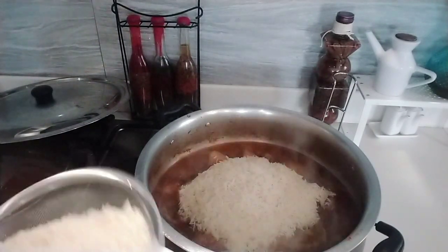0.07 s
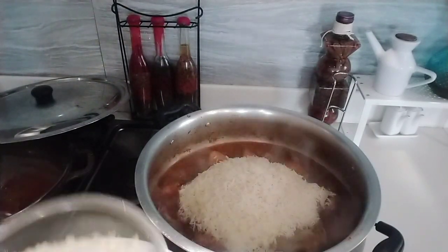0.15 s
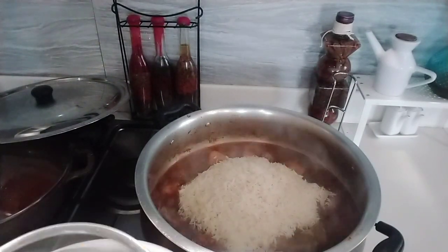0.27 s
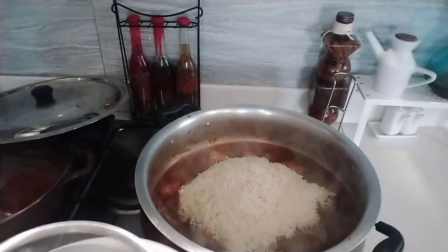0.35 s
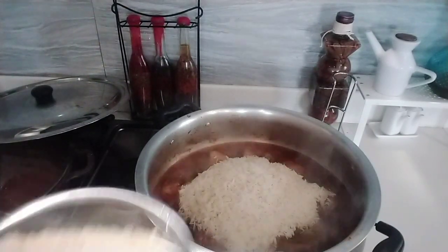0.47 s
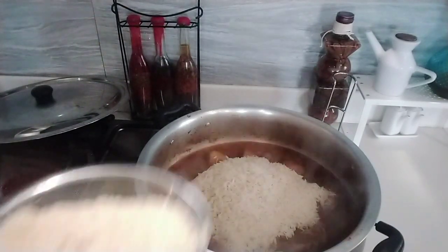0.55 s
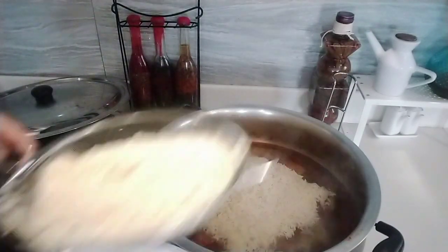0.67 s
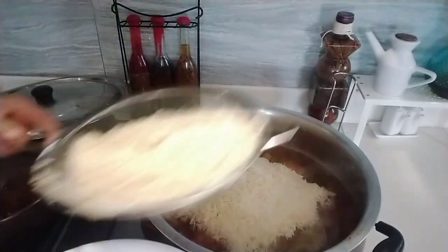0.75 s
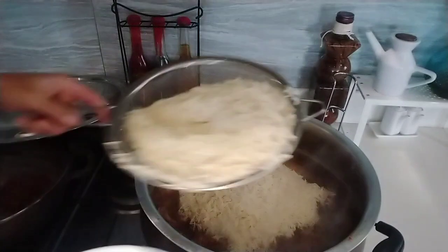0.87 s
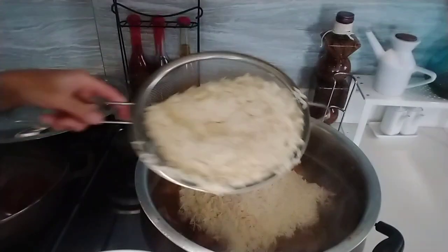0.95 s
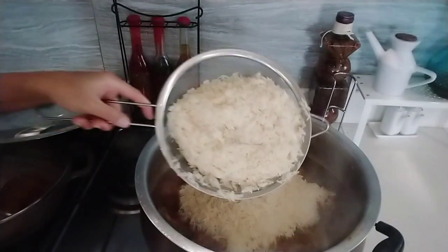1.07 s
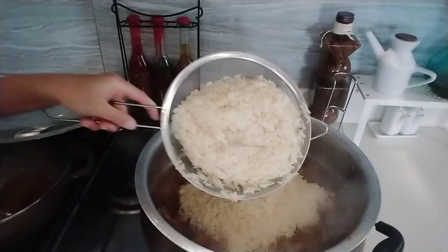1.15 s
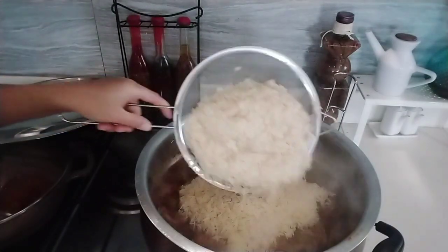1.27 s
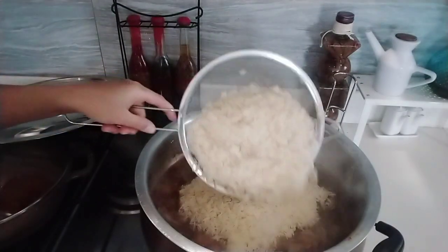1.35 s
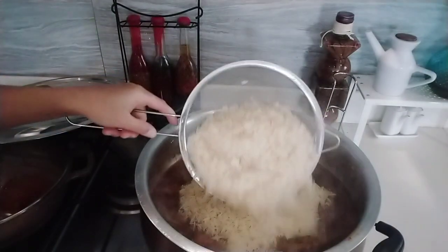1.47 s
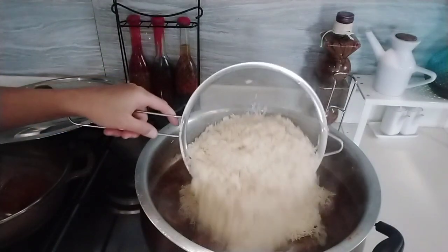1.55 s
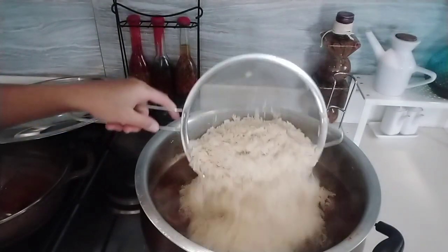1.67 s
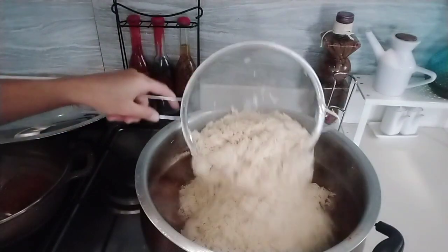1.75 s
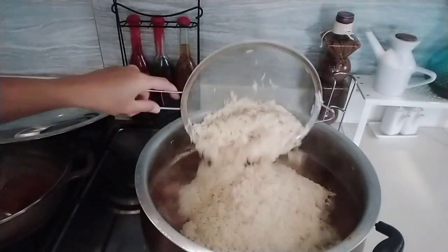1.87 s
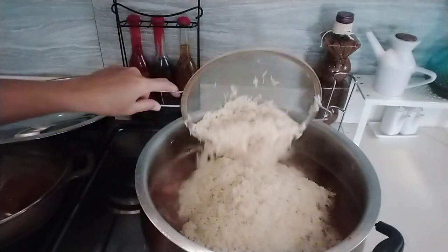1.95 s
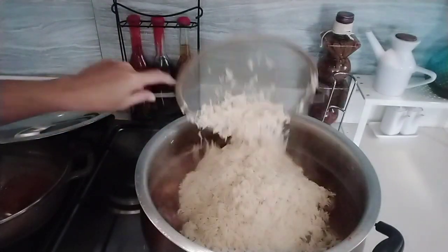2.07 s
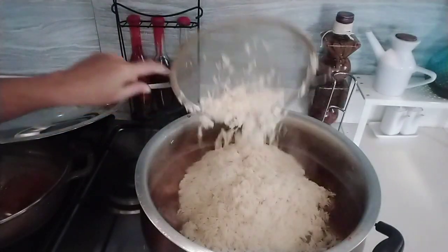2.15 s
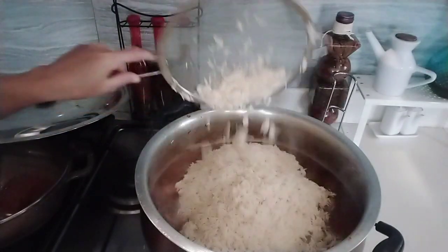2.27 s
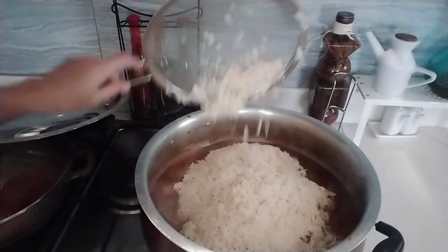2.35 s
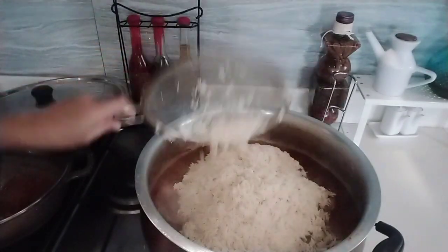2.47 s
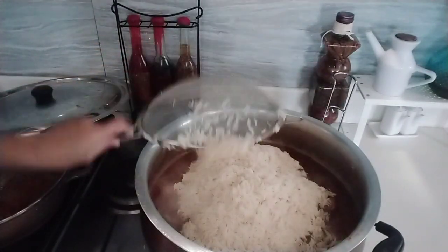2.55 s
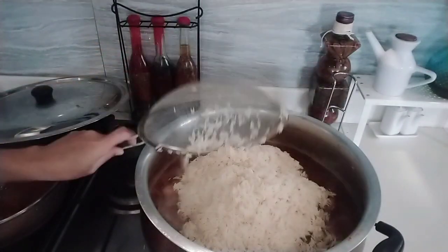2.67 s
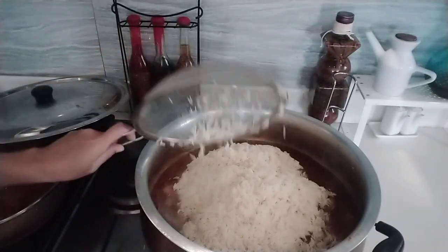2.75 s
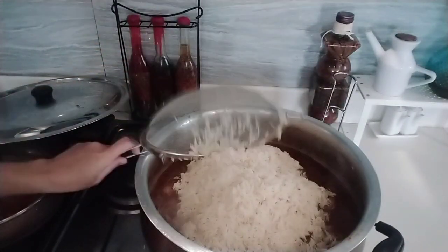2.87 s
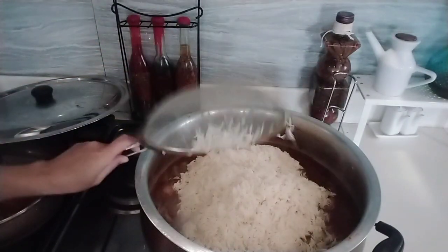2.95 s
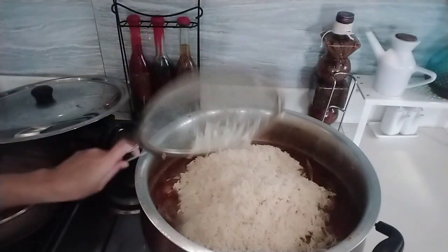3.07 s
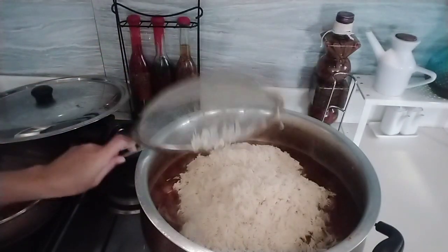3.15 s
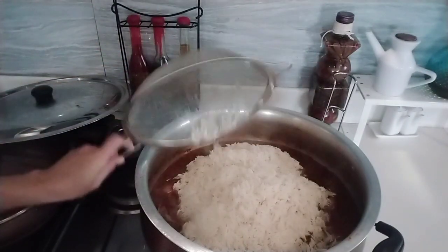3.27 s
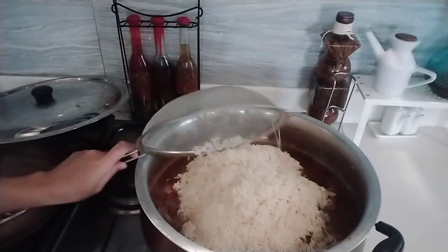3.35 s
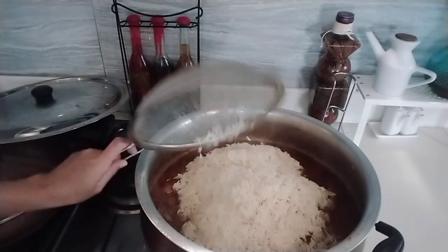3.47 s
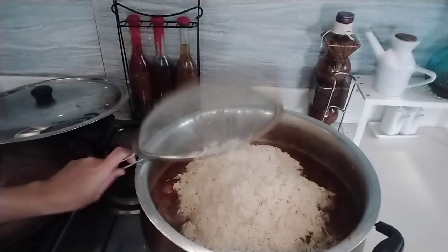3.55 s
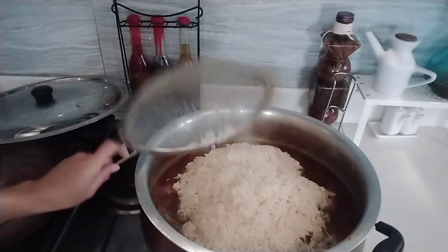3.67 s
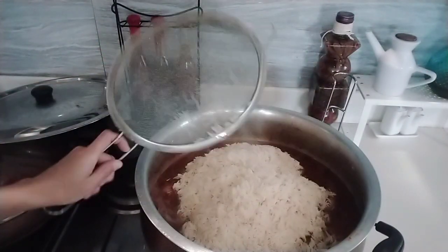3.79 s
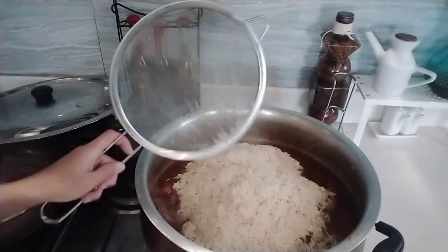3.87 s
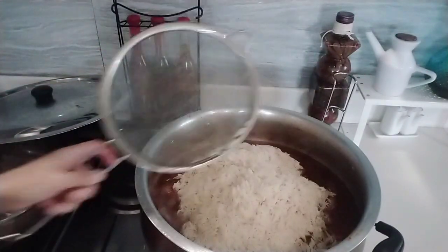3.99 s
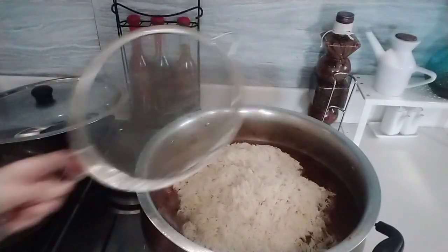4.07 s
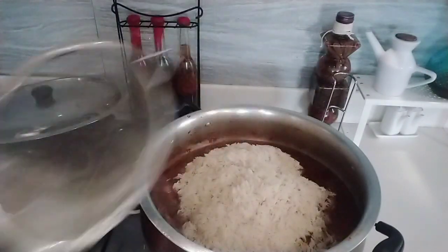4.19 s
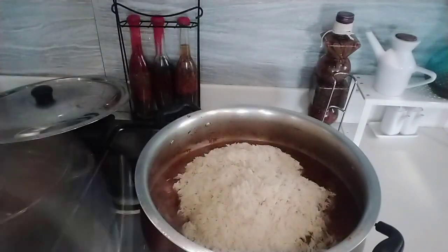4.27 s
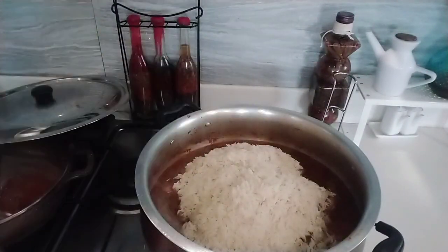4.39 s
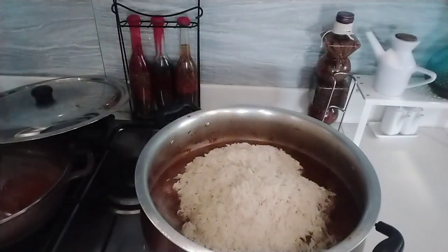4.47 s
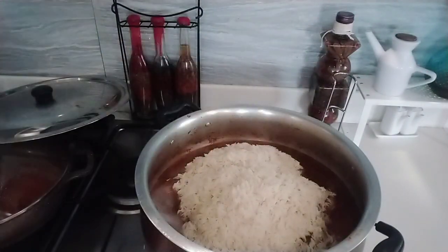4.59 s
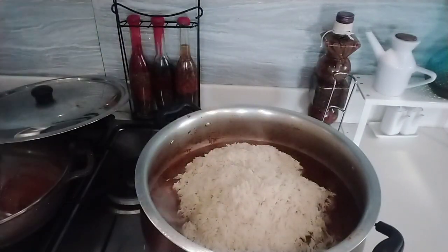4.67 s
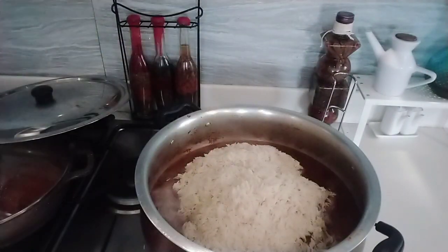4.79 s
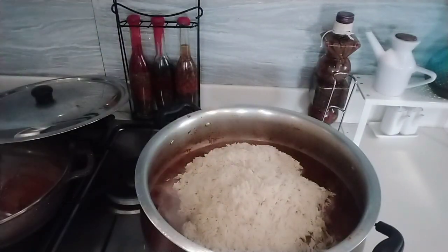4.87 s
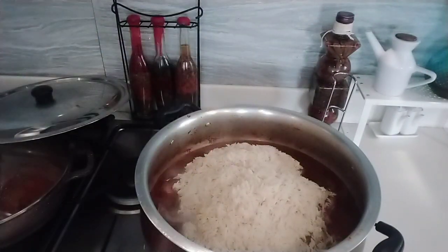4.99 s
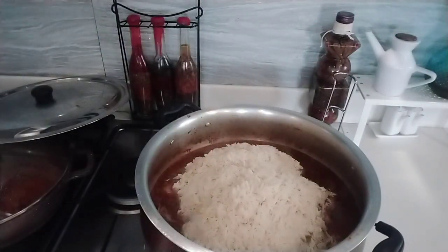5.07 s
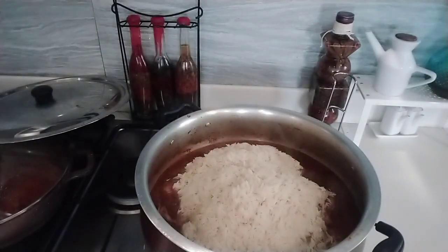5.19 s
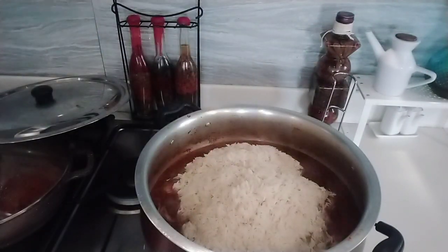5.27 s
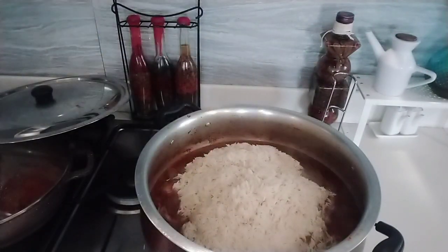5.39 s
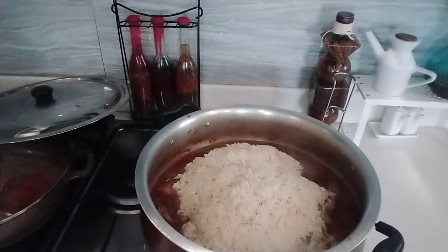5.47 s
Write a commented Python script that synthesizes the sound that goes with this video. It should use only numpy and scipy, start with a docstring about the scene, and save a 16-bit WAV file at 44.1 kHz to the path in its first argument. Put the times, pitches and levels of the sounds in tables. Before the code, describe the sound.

Steady simmering hiss and soft bubbling plops, a swelling rush of falling grains, five hard metallic clanks, then quieter sizzle with small ticks.

```python
"""In a small kitchen, a steel pot simmers on a gas burner while wet rice slides in from a wire strainer.
The strainer is then knocked five times on the rim: each blow is a burst of noise and a crowd of ringing tones.
Shaped noise makes the burner, low thumps and sizzle, rising sine tones the plops, random clicks the rice and
its scrape. Short bursts of noise make small taps and wet ticks. A small, bright microphone hears it all through
a limiter and a gain control that stays turned down after the knocks."""
import sys
import numpy as np
from scipy import signal
from scipy.io import wavfile
from scipy.ndimage import uniform_filter1d

SR = 44100
rng = np.random.default_rng(int(sys.argv[2]) if len(sys.argv) > 2 else 0)


def unload_audio(sound):
    """Save the sound as a 16-bit wav file, at the path given as the first command line argument."""
    columns = np.transpose(np.atleast_2d(sound))
    # keep every value between -1 and 1, then stretch to whole-number steps
    steps = np.round(np.clip(columns, -1, 1) * 32767)
    wavfile.write(sys.argv[1], SR, steps.astype(np.int16))


N = 243873
TIME = np.arange(N) / SR  # seconds

# burner flame, its low rumble: (frequency [Hz], level per Hz [dB])
FLAME_SPECTRUM = [(15, -59), (25, -25), (38, -9), (50, -14), (68, 0.5), (95, -13.5), (120, -2.5), (142, 1),
                  (158, -4.5), (182, -2.5), (230, -17), (330, -16.5), (600, -38.5)]
# swells of the low rumble, short or long: gusts of the flame, low thumps, and near 1.26 s the thud of
# landing rice: (time of the peak [s], length [s], rise [dB])
RUMBLE_SWELLS = [(0.303, 0.17, 3.5), (1.26, 0.83, 3), (2.714, 0.74, 5.5), (4.764, 0.1, 5.5),
                 (5.11, 0.15, 3.5), (5.4, 0.25, 8)]
# sizzle at the wall of the pot: (frequency [Hz], level per Hz [dB])
SIZZLE_SPECTRUM = [(150, -21.5), (250, 3), (420, 10.5), (580, 0), (850, -5.5), (1200, -5.5), (1700, -2),
                   (2800, -2), (4500, -3.5), (6000, -3.5), (8000, -2), (11000, -5), (15500, -10)]
# base levels [dB]: the sizzle before pot and microphone colour it,
# the flame before the microphone and its own swells and flutter
SIZZLE_DB, FLAME_DB = -52.5, -50.5
# bursting bubbles: (time [s], starting pitch [Hz], level [dB])
PLOPS = [(0.963, 1330, -47), (1.183, 1080, -43), (1.291, 1020, -44), (1.542, 1050, -37.5),
         (1.915, 670, -47), (2.1, 730, -36), (2.743, 1000, -37.5), (4.776, 1060, -51)]
# resonances of the air in the pot: (frequency [Hz], width [Hz], level [dB])
POT_AIR = [(347, 18, -2), (461.7, 12.7, 3.5), (700, 87, 0), (1002, 98, 0), (1318, 126, -1)]
# small taps and spits: (time [s], level [dB], low weight [dB], top rattle of the mesh [dB])
TAPS = [(.174, -40, -18, -10), (.358, -51, 12.5, -10), (0.369, -38, 1, -8), (0.612, -44.5, -18, -3),
        (1.327, -42.5, 3, -6), (1.502, -40.5, -16, -6), (2.1, -42, -15, -4), (2.171, -44.5, -11, -10),
        (4.239, -43.5, 1, -9), (4.495, -46, 5, -4), (4.612, -39, 4, 1), (4.633, -37.5, 2.5, 0)]
# wet ticks of grains and drips: (time [s], pitch [Hz], level [dB])
DRIPS = [(0.439, 2980, -48), (.478, 4380, -48), (2.104, 4200, -43.5), (2.392, 3930, -43), (3.14, 4100, -32),
         (4.303, 3300, -48), (4.743, 4080, -46), (4.856, 3260, -47), (5.147, 4100, -51)]
# colour of the falling grains: (frequency [Hz], level per Hz [dB])
PATTER_SPECTRUM = [(200, -19), (500, -7), (750, 6), (1400, -1), (1900, -8), (2700, 3.5), (3550, -15),
                   (3850, -3), (4200, 4.5), (4800, -6), (6500, 0.5), (15000, -6.5)]
# the rice comes in surges, a first lump, the bulk, the shaken-out rest:
# (time of the peak [s], length [s], level [dB])
RICE_SURGES = [(1.205, 0.98, -63), (2.193, 1, -54), (3.053, 1, -50.5)]
# the last grains scrape down the tipped mesh, a single row:
# (time of the peak [s], length [s], level [dB], pitch [Hz], width [Hz])
SCRAPE = (2.5, 0.9, -55, 4030, 300)
# blows of the strainer, with light touches and bounces: (time [s], force [dB], low ring of the pot [dB],
# ring of the hoop [dB], top rattle of the mesh [dB], crack [dB], clear modes [dB])
KNOCKS = [(2.458, -26, 9, -1, -17, 0, -12), (2.4703, -9, 3, 5, -9, 10.5, 2),
          (2.78, -20, 6, -2, -42, 10, -10), (2.7852, -3, 5, 3.5, -5, 1.5, 1.5),
          (2.9756, -2, -6.5, -5, -3, 5, -1.5), (3.012, -2, -4.5, -6.5, -6.5, -15, 1),
          (3.2084, -5.5, 3, -16, -47, -4, 0.5), (3.212, 2.5, 0.5, 0, -6.5, 5, -2),
          (3.46, 2, -4, -3, -5.5, 4, -3)]
# ringing tones (modes) of pot and strainer: (frequency [Hz], level as heard through the microphone [dB])
STEEL_MODES = [(581, -10), (649, -11), (1015, -3.5), (1051, -10.5), (1280, -1.5), (1319, -9.5), (1384, -12),
               (1416, -5), (1561, -8), (1728, -7), (1785, -1.5), (1879, -22), (2083, -13), (2534, -9.5),
               (2739, -8.5), (2989, -9.5), (3374, -4.5), (3949, -1), (4261, -16), (4409, -11), (4492, -5),
               (4706, -7), (4888, -24), (5101, -9), (5385, -1), (7251, 0), (7751, -3), (8041, 2), (8573, 0),
               (9236, 5)]
# the crowd of weaker modes between them: (frequency [Hz], level per Hz [dB])
CLANG_SPECTRUM = [(120, -22), (270, -6), (560, -0.5), (820, -9), (1150, -7), (1700, 0.5), (2400, -4),
                  (3100, 0), (4200, -0.5), (5400, 6), (6050, -1), (7400, 4), (10500, 7), (15500, 4.5)]
# how long the weak modes take to fall by 60 dB: (frequency [Hz], time [s])
CLANG_T60 = [(200, 0.47), (1500, 0.39), (3000, 0.4), (5500, 0.35), (8000, 0.32), (15000, 0.25)]
# the first hard contact of wire and rim: (frequency [Hz], level per Hz [dB])
CRACK_SPECTRUM = [(200, -16), (1500, -8), (3500, -13.5), (5400, 4), (8000, 7), (15500, 4.5)]
# cluster half width (share of pitch, on top of a fixed split), and how far the struck spot shifts a mode [dB]
MODE_SPREAD, SPOT_DB = .005, 3
# microphone colour, with the split resonance of its port: (frequency [Hz], gain [dB])
MIC_COLOUR = [(20, 1.5), (5000, 1), (6100, 3), (7200, 7.5), (7650, 11.5), (7900, 4.5), (8100, 12.5),
              (8500, 13), (9300, 8.5), (10100, 3.5), (10600, 3.5), (11500, 0.5), (16000, 2)]
EDGE_HZ = 15600  # top of the band that is kept


def gain_of(db):
    """Turns decibels into a gain."""
    return 10 ** (np.asarray(db) / 20)


def evened(x):
    """Scales a sound to an average (rms) level of 1."""
    return x / np.sqrt(np.mean(x ** 2) + 1e-20)


def read(points, hz):
    """Reads between table points, with pitch on a log scale as we hear it."""
    table_hz, value = np.transpose(points)
    return np.interp(np.log(hz + 1), np.log(table_hz + 1), value)


def add(mix, s, sound):
    """Mixes a sound in at time s (seconds)."""
    part = mix[round(s * SR):][:len(sound)]
    part += sound[:len(part)]


def colour(x, points, size=16384):
    """Gives a sound the listed spectrum, with a filter that never answers before its input."""
    hz = abs(np.fft.fftfreq(size, 1 / SR))
    log_gain = np.log(gain_of(read(points, hz)))
    # the Hilbert transform finds the phase that puts the energy first
    response = np.exp(np.conj(signal.hilbert(log_gain)))
    filter_taps = np.fft.ifft(response).real[:size // 2]
    return signal.fftconvolve(x, filter_taps)[:len(x)]


def resonance(x, hz, width_hz):
    """Picks out the part of a sound that one resonance answers to."""
    b, a = signal.iirpeak(hz, hz / width_hz, SR)
    return signal.lfilter(b, a, x)


def hump(s, length_s):
    """A smooth rise and fall, of height 1 at time s."""
    return np.cos(np.pi * np.clip((TIME - s) / length_s, -.5, .5)) ** 2


def grains(per_s, spread_db):
    """Random clicks of uneven size, like many small separate hits."""
    size = gain_of(spread_db * np.minimum(rng.exponential(1, N), 4))
    happens = rng.random(N) < per_s / SR
    return evened(happens * rng.choice([-1, 1], N) * size)


def kitchen(x, wet_db, t60=0.1):
    """Adds the short tail of a tiled room: noise that falls by 60 dB in t60 seconds."""
    t = TIME[:SR // 2]
    fade = np.exp(-np.log(1000) * t / t60)
    tail = rng.standard_normal(len(t)) * fade * (t > .003)  # starts after 3 ms
    echo = signal.fftconvolve(x, tail / np.linalg.norm(tail))[:N]
    return x + gain_of(wet_db) * echo


def in_pot(x, direct_db=-1.11):
    """The air in the open pot resonates and lends a hollow note to what happens inside."""
    hollow = sum(gain_of(db) * resonance(x, hz, width_hz) for hz, width_hz, db in POT_AIR)
    return gain_of(direct_db) * (x + hollow)


def burner(flutter_db=0.9):
    """The flame is low noise that flutters under the pot; its swells also stand for thumps and a thud of rice."""
    swell_db = sum(rise_db * hump(s, length_s) for s, length_s, rise_db in RUMBLE_SWELLS)
    flame = evened(colour(rng.standard_normal(N), FLAME_SPECTRUM))
    flutter = evened(uniform_filter1d(rng.standard_normal(N), size=8000))  # slow random wobble
    return gain_of(FLAME_DB + swell_db + flutter_db * flutter) * flame


def sizzle(crackle_db=-2):
    """Countless tiny bursts of steam: a smooth hiss with crackle in it."""
    crackle = evened(kitchen(grains(500, spread_db=4.5), wet_db=0.0))
    hiss = rng.standard_normal(N)
    return gain_of(SIZZLE_DB) * evened(colour(hiss + gain_of(crackle_db) * crackle, SIZZLE_SPECTRUM))


def plop(hz, cycles, rise=0.043):
    """A bubble rings and dies away over some cycles while its pitch creeps up."""
    turns = hz * TIME[:SR // 12]
    age = turns / cycles
    tone = np.sin(2 * np.pi * turns * (1 + rise * np.tanh(age)))
    return tone * np.exp(-age) * (1 - np.exp(-turns))  # soft start


def bubbles(small_db=-59.5):
    """A few clear plops over a dense, soft simmer of small bubbles at 20 pitches."""
    clear = np.zeros(N)
    for s, hz, db in PLOPS:
        add(clear, s, gain_of(db) * plop(hz, cycles=3.0))
    simmer = np.zeros(N)
    for hz in np.geomspace(330, 1400, 20):
        bursts = signal.oaconvolve(grains(25, spread_db=1.5), plop(hz, cycles=4))[:N]
        simmer += bursts * hz ** -.2  # higher ones are weaker
    return kitchen(clear + gain_of(small_db) * evened(simmer), wet_db=-4.5)


def taps(tick_s=0.0089):
    """Brief ticks of fading noise, with a strong share of room sound."""
    t, out = TIME[:SR // 20], np.zeros(N)
    for s, db, weight_db, mesh_db in TAPS:
        tick = rng.standard_normal(len(t)) * np.exp(-t / tick_s)
        spot = [(1700, weight_db), (7400, 0), (12000, mesh_db)]
        add(out, s, gain_of(db) * colour(tick, spot))
    return kitchen(out, wet_db=-1.5, t60=0.34)


def drips(tick_s=0.0051, width_hz=900):
    """A drop or a grain gives a short, roughly pitched tick: a fading narrow band of noise."""
    t, out = TIME[:SR // 20], np.zeros(N)
    for s, hz, db in DRIPS:
        band = resonance(rng.standard_normal(len(t)), hz, width_hz)
        band = resonance(band, hz, width_hz)  # twice, for a clearer pitch
        add(out, s, gain_of(db) * evened(band) * np.exp(-t / tick_s))
    return kitchen(out, wet_db=-5)


def rice(clump_db=3):
    """Wet grains slip over the mesh and land in the pot in clumps."""
    clumps = evened(uniform_filter1d(rng.standard_normal(N), size=1300))
    fall = kitchen(grains(600, spread_db=3) * gain_of(clump_db * clumps), wet_db=0)
    flow = sum(gain_of(db) * hump(s, length_s) for s, length_s, db in RICE_SURGES)
    return flow * evened(colour(fall, PATTER_SPECTRUM))


def scrape():
    """Grains catch on the wires and set the nearly bare mesh ringing."""
    s, length_s, db, hz, width_hz = SCRAPE
    ring = evened(resonance(grains(900, spread_db=2.5), hz, width_hz))
    return gain_of(db) * hump(s, length_s) * ring


def dying(t60s, count):
    """Noise in which each band dies at its own speed."""
    hz, t, bands = signal.stft(rng.standard_normal(count), SR, nperseg=256)
    bands = bands * 1000. ** (-t / read(t60s, hz)[:, None])
    return signal.istft(bands, SR)[1][:count]


def ringing(t, split_hz=6, t60_at_1khz=0.32, count=6):
    """Each mode is a cluster of close partners that beat, struck differently by every blow; high ones die sooner."""
    hz, db = np.repeat(STEEL_MODES, count, axis=0).T
    db = db + SPOT_DB * np.repeat(rng.uniform(-0.92, 1, len(STEEL_MODES)), count)
    partner = np.tile(np.arange(count), len(STEEL_MODES))
    place = (partner + rng.random(len(hz))) * 2 / count - 1  # -1 to 1 across the cluster
    hz = (hz + (split_hz + MODE_SPREAD * hz) * place)[:, None]
    t60 = t60_at_1khz * (hz / 1000) ** -.15
    heights = gain_of(db - read(MIC_COLOUR, hz[:, 0]))  # the microphone adds its colour back later
    waves = np.sin(2 * np.pi * (hz * t + rng.random(hz.shape)))
    partials = waves * np.exp(-np.log(1000) * t / t60)
    return np.sqrt(2) * heights @ partials / np.linalg.norm(heights)


def knocks(clang_db=-17.0, modes_db=-19.0, crack_s=0.0048, swell_s=0.0023):
    """Each blow is a hard crack; then the strong modes swell and a crowd of weak ones rattles round the pot."""
    t, crowd, modes = TIME[:SR * 2 // 5], np.zeros(N), np.zeros(N)
    swell = 1 - np.exp(-t / swell_s)
    for s, force_db, weight_db, rim_db, mesh_db, crack_db, free_db in KNOCKS:
        # colour of the place that is hit
        spot = [(1700, weight_db), (2900, rim_db), (4100, rim_db), (7400, 0), (12000, mesh_db)]
        burst = rng.standard_normal(len(t)) * np.exp(-t / crack_s)
        crack = gain_of(crack_db) * colour(burst, CRACK_SPECTRUM)
        clang = colour(dying(CLANG_T60, len(t)) * swell, CLANG_SPECTRUM)
        add(modes, s, gain_of(force_db + free_db) * colour(ringing(t) * swell, spot))
        add(crowd, s, gain_of(force_db) * colour(clang + crack, spot))
    return gain_of(modes_db) * modes + gain_of(clang_db) * kitchen(crowd, wet_db=-3.5, t60=0.15)


def scene():
    """Everything on the stove, heard from one point."""
    inside = in_pot(sizzle() + bubbles() + rice())
    return (burner() + inside + taps() + drips() + scrape() + knocks())[None]


def held(db, recover_db_per_s):
    """Jumps up with its input and sinks back at a steady rate."""
    fall = TIME * recover_db_per_s
    return np.maximum.accumulate(db + fall) - fall


def record(dry, limit_db=-18.0, slow_limit_db=-24, slow_db_per_s=18):
    """Microphone colour, slow gain control, fast limiter, soft overload, band limit."""
    x = colour(dry[0], MIC_COLOUR)
    power = signal.lfilter(np.ones(128) / 128, 1, x ** 2)  # average over about 3 ms
    power_db = 10 * np.log10(power + 1e-12)
    # the slow gain creeps down for as long as the sound is loud, and holds there
    loudness = np.clip((power_db - slow_limit_db) / 6, 0, 1)  # full speed from 6 dB above the limit
    slow_db = slow_db_per_s * np.cumsum(loudness) / SR
    # the limiter lets the first milliseconds through, then flattens the ring
    over_db = held(np.maximum(power_db - slow_db - limit_db, 0), recover_db_per_s=273)
    keep = np.exp(-1 / (.002 * SR))  # 2 ms smoothing
    fast_db = signal.lfilter([1 - keep], [1, -keep], over_db)
    x = x / gain_of(slow_db + fast_db)
    x = .5 * np.tanh(x / .5)  # soft overload rounds off the peaks
    low_pass = signal.firwin(511, EDGE_HZ, window=("kaiser", 9), fs=SR)
    return signal.oaconvolve(x, low_pass, "same")[None]


dry = scene()
out = record(dry)
unload_audio(out)
```